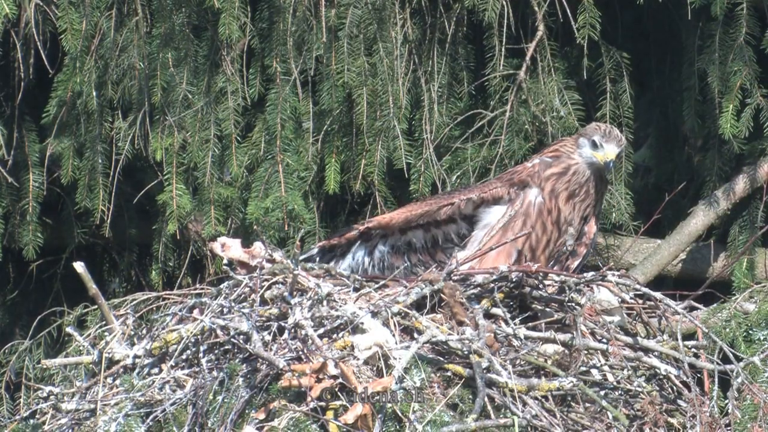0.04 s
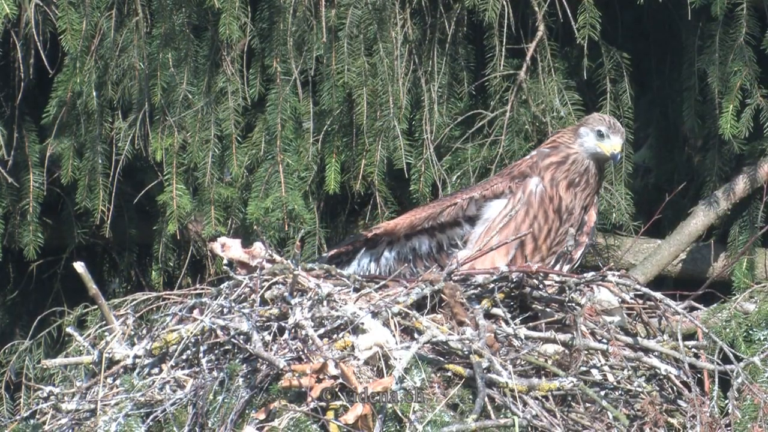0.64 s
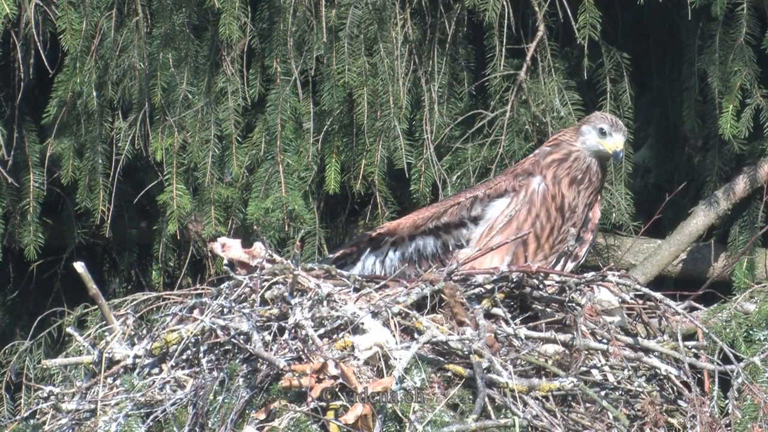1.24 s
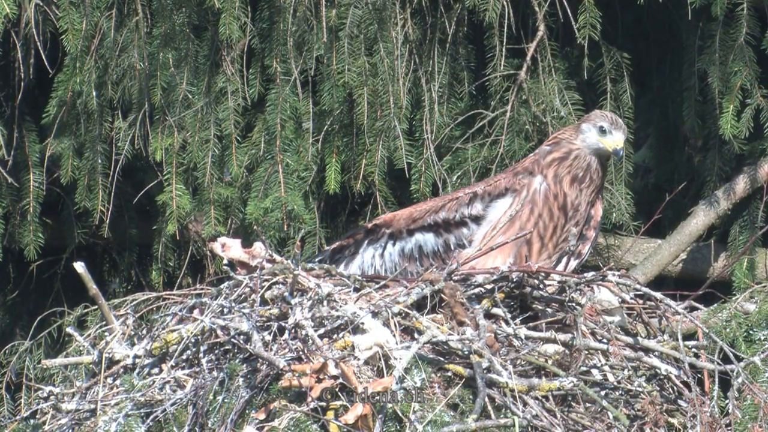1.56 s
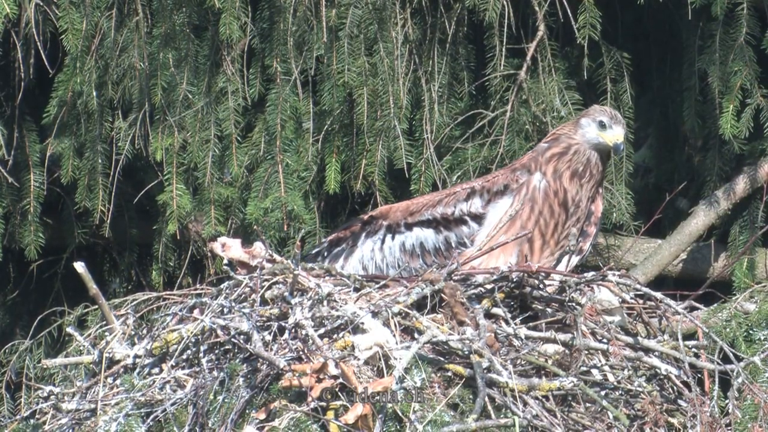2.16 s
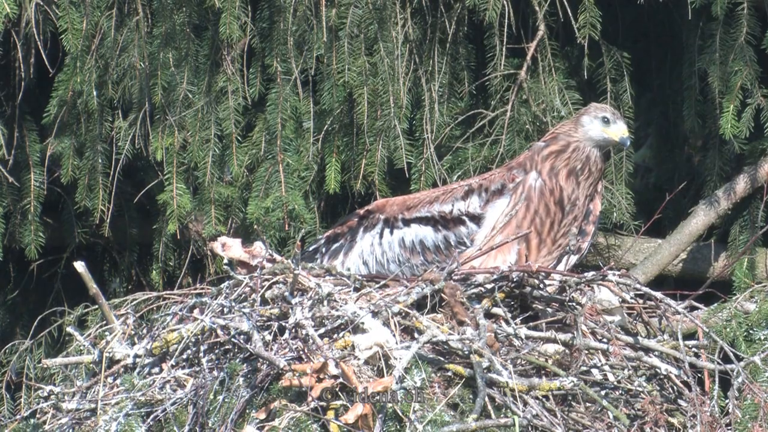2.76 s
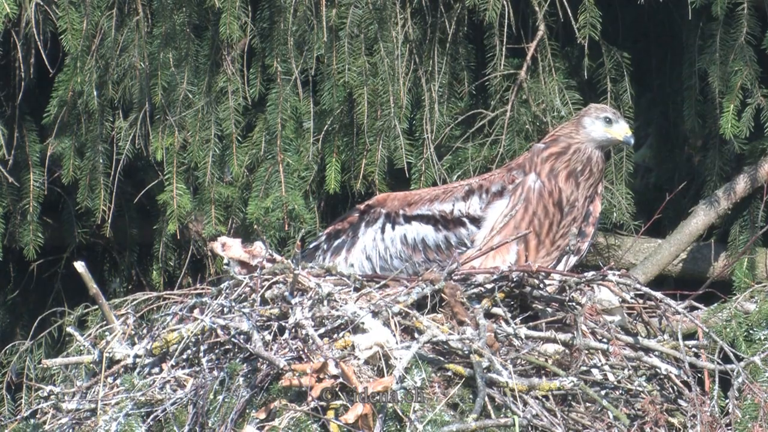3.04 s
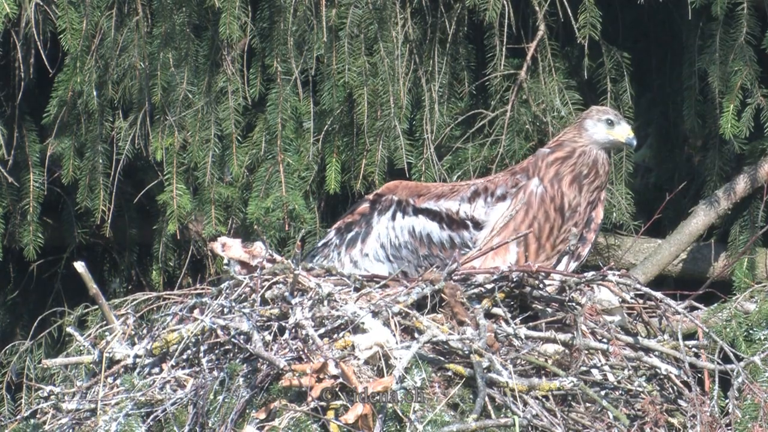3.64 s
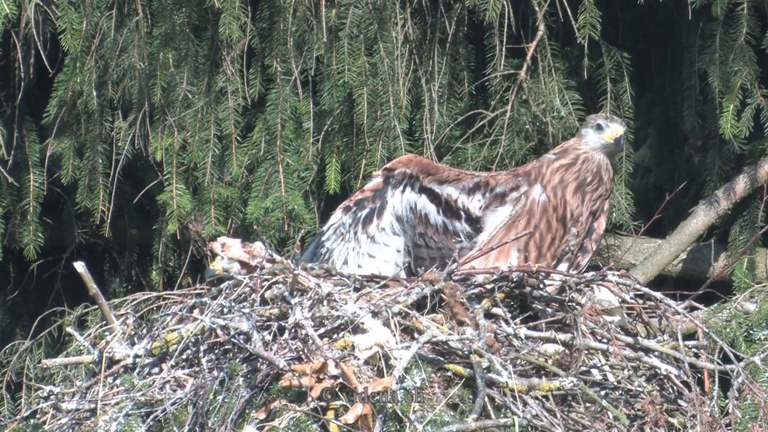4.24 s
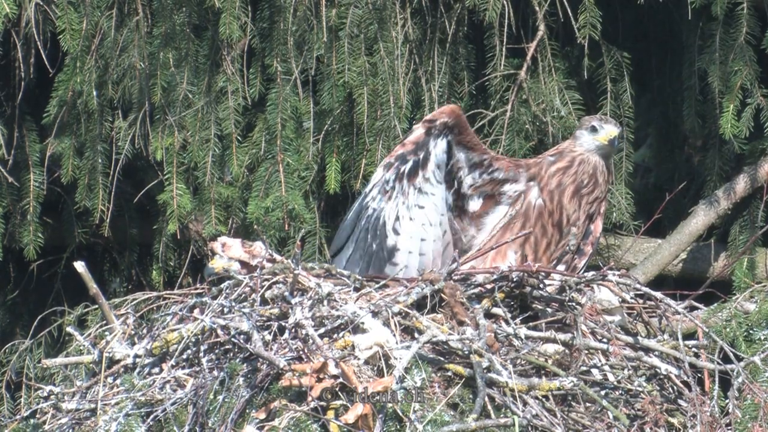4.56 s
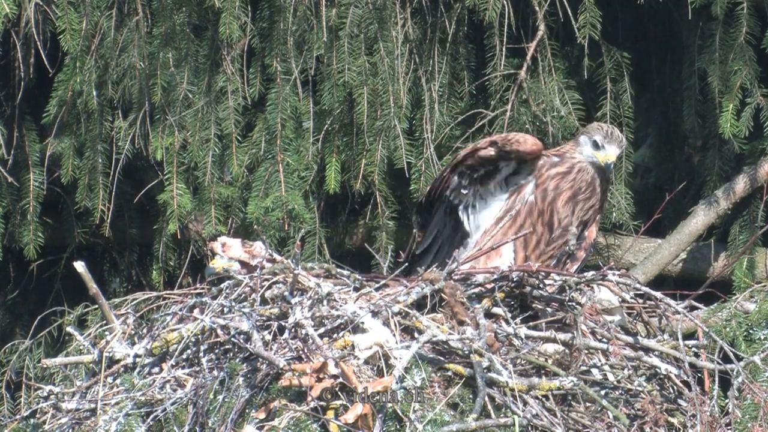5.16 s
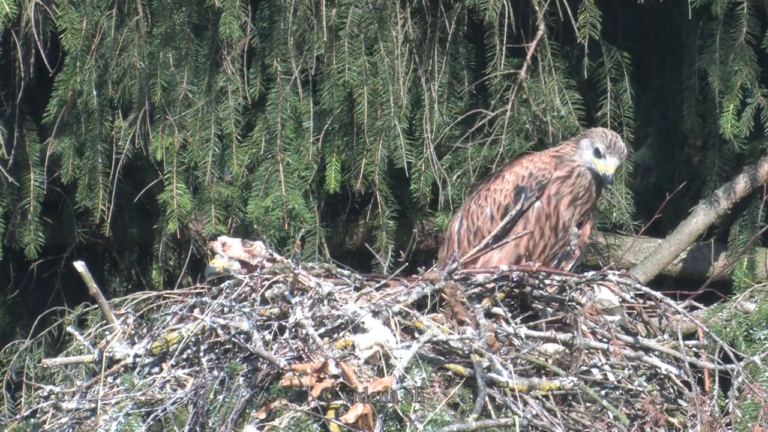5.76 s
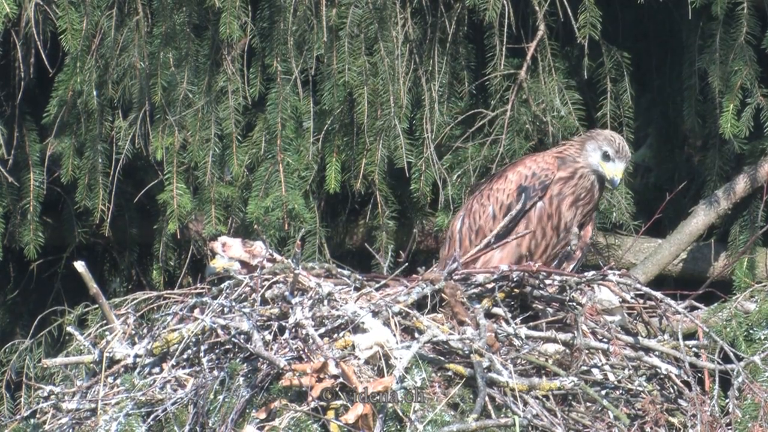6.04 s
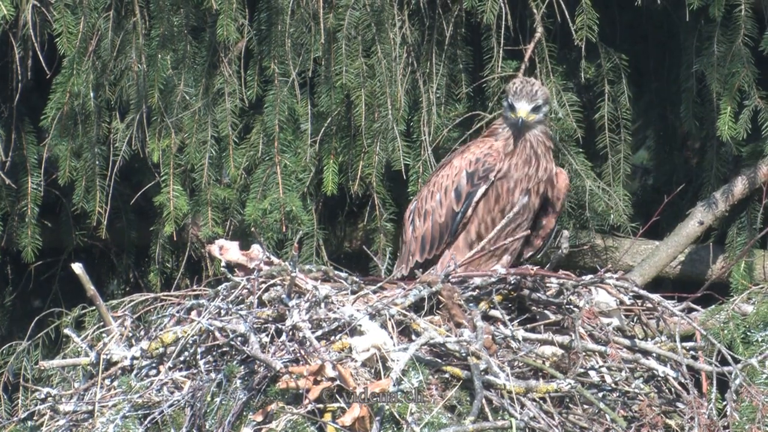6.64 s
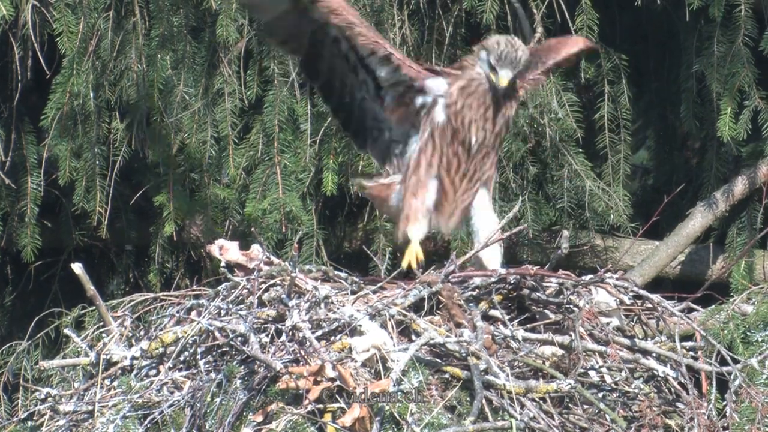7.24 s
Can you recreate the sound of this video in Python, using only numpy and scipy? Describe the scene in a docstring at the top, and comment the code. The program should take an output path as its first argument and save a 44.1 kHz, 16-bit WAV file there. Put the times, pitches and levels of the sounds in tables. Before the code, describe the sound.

A small songbird sings fast, bright chirps and whistles close by in woodland, over faint distant birds and light wind.

```python
"""A warbler's fast whistled phrases ring out close by in a spruce wood; the trees scatter each note. Other
birds call far off over light wind and a distant motor drone, and a low rumble swells near the end. All is heard
through a nest camera that samples slowly: loud notes overload it, it gives a few dry ticks, and spectral
imaging gives high notes a mirror tone in the treble."""
import sys
import numpy as np
from scipy import signal
from scipy.fft import rfft, irfft
from scipy.io import wavfile
from scipy.ndimage import uniform_filter1d

SR = 44100
rng = np.random.default_rng(int(sys.argv[2]) if len(sys.argv) > 2 else 0)


def pcm_store(signal):
    """Save signal as 16-bit PCM."""
    levels = np.round(np.clip(np.atleast_2d(signal), -1, 1) * 32767)
    wavfile.write(sys.argv[1], SR, levels.astype(np.int16).T)


N = 321489
TIME = np.arange(N) / SR
DECIMATION = 4  # the camera samples at SR / DECIMATION


def gain_of(db):
    """Amplitude ratio of a level in decibels."""
    return 10 ** (np.asarray(db) / 20)


def unit_rms(x):
    """Normalisation to an rms of 1."""
    return x / np.sqrt(np.mean(x ** 2) + 1e-20)


def spectrum_at(points, hz):
    """Interpolation of a spectrum on a logarithmic frequency axis."""
    f, value = np.transpose(points)
    return np.interp(np.log(hz + 1), np.log(f + 1), value)


def envelope(curve, column=1):
    """Amplitude envelope, interpolated in decibels."""
    rows = np.array(curve)
    return gain_of(np.interp(TIME, rows[:, 0], rows[:, column]))


def filtered(x, response):
    """Zero-phase filtering: the spectrum is multiplied by a frequency response."""
    return irfft(rfft(x) * response(np.fft.rfftfreq(N, 1 / SR)), N)


def noise(response):
    """Spectral shaping of white noise, at an rms of 1."""
    return unit_rms(filtered(rng.standard_normal(N), response))


def drift(rate_hz):
    """Random modulation: low-pass noise that varies at about the given rate."""
    return noise(lambda hz: np.exp(-(hz / rate_hz) ** 2))


def resonance(centre_hz, half_width_hz):
    """A single resonance excited by noise."""
    return noise(lambda hz: 1 / (1 + ((hz - centre_hz) / half_width_hz) ** 2))


def progress(length):
    """Normalised time, 0 to 1 over a note."""
    return np.linspace(0, 1, max(int(length * SR), 8))


def glides(rows, bow=0):
    """Linear frequency sweeps, bowed upward by a share of their pitch."""
    for start, length, first, last, db in rows:
        u = progress(length)
        yield start, (first + (last - first) * u) * (1 + bow * np.sin(np.pi * u)), db, 0


def tones(notes, waver=.0013, flutter_db=-3, attack_s=.06, release_s=.0073, overtone_db=-42,
          rough=0, slew_rough=0, buzz_hz=190, buzz_slew_hz_per_s=35000):
    """Modulated sines, one per (start, pitch curve, level, roughness); fast modulation is heard as rasp."""
    buzz = 2 * np.pi * np.cumsum(buzz_hz * (1 + .3 * drift(59.85))) / SR
    bend = 1 + waver * drift(300)
    shake = .055 * np.sin(buzz) + .025 * drift(620)
    flutter = gain_of(flutter_db * drift(150))
    out = np.zeros(N)
    for start, hz, db, note_rough in notes:
        age = np.arange(len(hz))
        at = np.minimum(max(int(start * SR), 0) + age, N - 1)
        slew = np.tanh(abs(np.gradient(hz)) * SR / buzz_slew_hz_per_s)
        rasp = np.clip(rough + note_rough + slew_rough * slew, 0, 1)
        phase = 2 * np.pi * np.cumsum(hz * (bend[at] + rasp * shake[at])) / SR
        attack = age / min(attack_s * SR, .19 * len(hz))
        release = age[::-1] / min(release_s * SR, .17 * len(hz))
        fade = np.sin(np.pi / 2 * np.minimum(np.minimum(attack, release), 1))
        tremolo = 1 + .42 * rasp * np.cos(buzz[at])
        overtone = gain_of(overtone_db) * np.sin(2 * phase) * (2 * hz < SR / DECIMATION / 2)
        out[at] += fade * flutter[at] * tremolo * gain_of(db) * (np.sin(phase) + overtone)
    return out


def tree_echoes(x, t60, build_s):
    """Reverberation by scattering: sparse echoes off trunks and boughs build up, then decay."""
    t = np.arange(SR) / SR
    taps = rng.standard_normal(SR) * (rng.random(SR) < .04)
    tail = taps * gain_of(-60 * t / t60) * (1 - np.exp(-(t / build_s) ** 2))
    return signal.fftconvolve(x, tail / np.linalg.norm(tail))[:N]


# spectrum of moving air: (frequency [Hz], relative level [dB])
WIND_SPECTRUM = [(15, -31), (25, -25.5), (50, -26.5), (80, -26.5), (130, -29.5), (200, -28.5), (500, -33.5),
                 (1000, -32.5), (1900, -36), (2900, -40.5), (3900, -36), (5000, -40.5), (5500, -35),
                 (6500, -69.5)]
# likeness of left and right: (frequency [Hz], correlation [0-1])
WIND_COHERENCE = [(30, 1), (130, 0.84), (300, 0.61), (1000, 0.63), (2000, 0.56), (3000, 0.82)]
# strength of the wind: (time [s], level at 300-1300 Hz [dB])
WIND_LEVEL = [(0, -61.5), (.6, -63), (3, -64), (5, -65), (6.33, -63.5), (6.9, -57.5), (7.29, -57)]


def wind():
    """Air in the trees: broadband noise, slowly swelling and partially coherent between the channels."""
    left, independent = rng.standard_normal((2, N))
    coherence = lambda hz: spectrum_at(WIND_COHERENCE, hz)
    right = filtered(left, coherence) + filtered(independent, lambda hz: np.sqrt(1 - coherence(hz) ** 2))
    air = filtered(np.array([left, right]), lambda hz: gain_of(spectrum_at(WIND_SPECTRUM, hz)))
    midband = filtered(air[0], lambda hz: (hz > 300) & (hz < 1300))
    return air / midband.std() * envelope(WIND_LEVEL) * gain_of(.39 * drift(7.4))


# strength of the motor's tone: (time [s], relative level [dB])
DRONE_LEVEL = [(0.0, -66.5), (0.28, -62.5), (2.39, -71), (4.1, -65.5), (5.72, -73), (5.78, -73.5),
               (6.35, -73.5), (6.4, -84)]


def motor_drone():
    """A distant motor: a wandering tone beats with narrow-band noise, above a lower hum."""
    tone = np.sqrt(2) * np.sin(2 * np.pi * np.cumsum(149 + 2.5 * drift(6)) / SR)
    drone = (1.02 * tone + .4 * resonance(149, 12)) * envelope(DRONE_LEVEL) * gain_of(1.5)
    return drone + resonance(118, 6.3) * gain_of(-72.5)


# spells of whine: (time [s], duration [s], first pitch [Hz], last pitch [Hz], level [dB])
WHINE_GLIDES = [(0, 0.5, 518, 502, -60.5), (5.78, 0.23, 535, 585, -65.5), (6.28, 0.148, 527, 453, -61),
                (6.72, .16, 534, 569, -61.5)]


def engine_whine():
    """A far engine drifts in and out: a gliding fundamental with its second harmonic."""
    return tones(glides(WHINE_GLIDES), waver=.0063, flutter_db=2, overtone_db=-8.5)


# strength of the rumble: (time [s], relative level of lowest band [dB], of upper bands [dB])
RUMBLE_LEVELS = [(6.35, -61, -81), (6.37, -73, -87), (6.454, -65, -56.5), (6.898, -48.5, -48),
                 (7.13, -60.5, -51.5), (7.232, -35, -47), (7.29, -51, -51)]


def rumble():
    """Noise excites two resonances about an octave apart and a weak, broad one above them."""
    onset = np.clip((TIME - RUMBLE_LEVELS[0][0]) / .24, 0, 1)
    low = resonance(102, 17.5) * envelope(RUMBLE_LEVELS) * gain_of(4.5)
    upper = resonance(220, 17.3) * gain_of(1.5) + resonance(342, 110) * gain_of(-9.5)
    bands = low + upper * envelope(RUMBLE_LEVELS, column=2)
    return filtered(onset * bands, lambda hz: 1 - np.exp(-(hz / 65) ** 4))


# dry crackles: (time [s], level [dB])
TICK_PULSES = [(1.527, -39.5), (4.459, -73), (4.701, -41), (5.186, -61), (5.298, -42.5), (5.695, -50),
               (6.227, -41), (6.335, -44.5)]


def ticks(decay_s=.0029):
    """Transients: bass-heavy noise under pulses that rise and decay exponentially."""
    pulses = sum(gain_of(db) * np.exp(-abs(TIME - when) / decay_s) for when, db in TICK_PULSES)
    colour = [(100, 11), (400, 4.5), (2500, 2.5), (8000, -19), (16000, -9.5)]
    return pulses * noise(lambda hz: gain_of(spectrum_at(colour, hz)))


# slow fluting: (time [s], duration [s], first pitch [Hz], last pitch [Hz], relative level [dB])
THRUSH_NOTES = [(.02, 0.1, 1550, 1314, -63), (.56, 0.21, 1740, 1630, -66), (.8, .22, 1520, 1442, -68.5),
                (1.5, .15, 1750, 1617, -64.5), (1.62, 0.079, 2000, 2120, -59.5),
                (1.75, .2, 1440, 1337, -66), (1.97, 0.12, 2250, 2106, -60.5),
                (2.35, 0.049, 1484, 1930, -62.5), (2.41, .055, 2010, 2110, -61),
                (.98, 0.052, 2110, 2100, -62.5), (2.64, .15, 2326, 2374, -66),
                (4.85, .07, 2296, 2218, -64.5), (6.08, 0.25, 2320, 2330, -62)]


def far_birds(count=70):
    """A thrush and scattered chirps, so distant that reverberation outweighs the direct sound."""
    when, length, pitch, glide, size = rng.random((count, 5)).T
    hz = 2750 + 1300 * pitch ** 2
    first, last = hz * (1 + .2 * (glide - .5)), hz * (1 - .25 * (glide - .5))
    rows = np.transpose([when * N / SR, .063 + .08 * length, first, last, -65 + 6 * size])
    thrush = tones(glides(THRUSH_NOTES, bow=.0092), waver=.006, flutter_db=5.5, attack_s=.023, rough=.11)
    chirps = tree_echoes(tones(glides(rows, bow=.012)), t60=.32, build_s=.0069)
    return chirps + gain_of(-1.5) * thrush + gain_of(1) * tree_echoes(thrush, t60=1, build_s=.0038)


# spells of soft chips: (start [s], end [s], rate [1/s], mean duration [s],
# mean upward sweep [share of pitch], highest level [dB])
TWITTER_SPELLS = [(0.203, 0.443, 25, 0.015, 0.029, -55), (0.807, 1.359, 30, 0.024, .35, -46.5),
                  (1.594, 1.95, 40, .025, -0.15, -51.5), (1.991, 2.08, 122, 0.02, -0.028, -48),
                  (2.101, 2.3, 22, 0.028, -0.15, -44.5), (3.498, 3.722, 18, 0.081, 0.017, -52.5),
                  (3.852, 3.96, 36, 0.021, 0, -47.5), (4.046, 4.122, 50, 0.011, 0.53, -42),
                  (5.757, 6.044, 37, 0.025, 0.094, -49), (6.32, 6.56, 42, .016, 0.12, -48.5)]


def twitter():
    """Short random frequency sweeps, heard as thin chips between the main notes."""
    rows = []
    for start, end, rate, length, rise, db in TWITTER_SPELLS:
        count = max(round((end - start) * rate), 1)
        for k, (jitter, stretch, pitch, glide, size) in enumerate(rng.random((count, 5))):
            onset = start + (k + jitter) / count * (end - start)
            hz = 2500 + 2500 * pitch
            sweep = (rise + .45 * (glide - .5)) / 2
            rows.append((onset, length * (.5 + stretch), hz * (1 - sweep), hz * (1 + sweep), db - 9 * size))
    return tones(glides(rows, bow=.03), attack_s=.008, release_s=.008, rough=.3)


# held whistles: (time [s], duration [s], pitch [Hz], relative level [dB])
LOW_PIPS = [(.091, 0.046, 2868, -28), (.172, 0.035, 2900, -26.5), (.245, 0.036, 2886, -27),
            (1.15, 0.038, 3040, -33.5), (1.649, 0.023, 3876, -28), (1.875, 0.056, 4340, -48.5),
            (2.09, 0.042, 4260, -48), (2.35, 0.065, 3040, -44), (2.43, 0.126, 3050, -56.5),
            (2.35, 0.047, 4390, -55.5), (3.137, 0.049, 3310, -42), (3.545, 0.067, 3123, -41),
            (3.68, 0.13, 2800, -52), (4.76, 0.089, 2986, -34.5), (4.857, 0.031, 2933, -28.5),
            (4.915, 0.045, 2882, -25), (6.792, 0.05, 2930, -25.5), (6.882, 0.042, 2943, -29)]
HIGH_SEETS = [(1.435, 0.08, 4910, -33.5), (2.552, 0.021, 5260, -33.5), (4.312, .057, 5060, -37),
              (4.42, .039, 4956, -37.5), (4.52, 0.03, 4924, -35), (4.995, 0.024, 5020, -45.5),
              (6.768, 0.034, 5020, -32.5), (6.855, 0.05, 4977, -34), (6.975, .026, 4890, -36)]


def held_notes(flick_hz=110, rough=.04):
    """Nearly constant frequency: each note flicks up into pitch, sags a little and drops off."""
    for rows, sag_hz, swell_db in (LOW_PIPS, 30, -1.5), (HIGH_SEETS, 60, 10):
        for start, length, hz, db in rows:
            u = progress(length) - .5
            yield start, hz - sag_hz * u - flick_hz * (2 * u) ** 4, db + swell_db * u, rough


# slurred whistles: (time [s], duration [s], first pitch [Hz], target pitch [Hz],
# relative level [dB], swell [dB])
SETTLING_FALLS = [(0, 0.037, 5700, 4516, -21.5, -13), (.535, 0.044, 4290, 3905, -29.5, 8),
                  (.626, 0.026, 5400, 4090, -25, 12), (1.503, .083, 4123, 3407, -22, -5.5),
                  (2.315, 0.036, 3470, 2885, -44.5, -5.5), (2.68, 0.11, 4400, 3260, -43.5, -14),
                  (2.86, 0.12, 2950, 2570, -50.5, -2), (3.5, 0.045, 3570, 3360, -39.5, -8),
                  (4.733, 0.038, 3700, 3080, -41.5, -2.5), (5.212, .044, 4950, 3764, -28.5, 11),
                  (5.287, 0.022, 5500, 4053, -22.5, 5.5), (6.15, 0.029, 4000, 3740, -40.5, 12.5),
                  (6.963, 0.049, 3795, 2890, -31.5, -10), (7.278, 0.027, 4660, 4240, -21, 18)]
HANGING_DROPS = [(.96, 0.03, 3150, 2414, -35.5, 1), (1.129, 0.022, 4280, 3220, -26, 0),
                 (2.178, .04, 4900, 4170, -35.5, -1), (2.18, 0.085, 3840, 2800, -45, -7),
                 (3.02, .025, 2210, 1990, -57.5, 0), (3.395, 0.069, 2770, 1850, -52, -8),
                 (3.565, 0.033, 3790, 3160, -33, 4), (3.905, 0.028, 3690, 3100, -31.5, -16),
                 (4.297, .031, 2310, 1950, -48.5, -2), (4.888, .053, 4410, 4306, -44, 0.5),
                 (5.668, .036, 3760, 3310, -19, -2.5), (5.785, .021, 2350, 1630, -40, 7),
                 (5.928, .062, 2913, 2466, -27, 6), (5.985, .035, 2440, 1870, -41, -1.5),
                 (5.013, .05, 3620, 3190, -47, 0), (6.335, .05, 4430, 4200, -52.5, 16.5),
                 (6.335, .04, 2320, 1800, -57, -20), (6.385, 0.019, 3660, 3110, -53.5, -4),
                 (7.03, 0.12, 4010, 3300, -48, -4)]
S_BENDS = [(.978, .04, 2694, 3000, -27, -1.5), (1.186, 0.071, 3010, 2486, -27.5, -9),
           (1.672, .059, 4046, 4154, -22, 0.5), (2.0, .046, 3290, 3860, -42.5, 10),
           (2.515, 0.033, 4240, 5400, -53, 28), (3.08, 0.033, 3130, 3340, -49, 7),
           (3.85, .04, 3405, 3655, -37.5, -8), (6.315, 0.024, 2760, 3730, -45.5, 0),
           (2.765, .045, 2900, 3720, -44, 10), (3.33, .06, 3485, 3800, -47.5, 0),
           (3.468, 0.022, 3290, 3840, -41.5, -3), (3.482, .023, 2464, 3765, -37.5, 24),
           (3.66, .035, 3356, 3930, -35.5, 0), (4.065, .033, 2007, 3700, -48, 5),
           (4.105, .022, 2170, 3890, -45, 18), (4.195, .012, 4040, 5700, -45, 11),
           (4.243, .01, 5140, 5320, -39, 7), (5.627, .046, 3508, 3685, -20.5, -1),
           (5.757, .02, 1960, 2600, -41.5, 7), (5.872, 0.078, 2845, 3030, -27.5, -16.5),
           (6.405, 0.028, 4360, 5960, -42, 5.5), (6.54, .06, 2407, 2800, -49, 9),
           (6.542, 0.0072, 4100, 5530, -40.5, 9)]
# whistles that reach the target midway and return, same columns
UP_AND_BACK = [(1.015, 0.051, 2864, 3428, -27, 2.5), (1.727, .016, 4560, 5500, -33, -15),
               (1.76, 0.062, 2790, 3280, -45, 5), (1.82, 0.05, 3510, 3950, -46, -4),
               (3.808, 0.058, 3460, 3770, -40, -13), (3.815, 0.033, 2456, 2880, -35, 4),
               (5.775, .05, 4810, 5055, -46, -5), (4.571, .052, 3870, 4520, -24, 7),
               (4.665, 0.039, 4640, 5296, -18, -1), (6.595, .062, 3846, 4230, -22.5, 4.5),
               (6.671, 0.058, 4690, 5300, -21, -5.5)]
DOWN_AND_BACK = [(1.338, 0.039, 5350, 5005, -21.5, 3.1), (1.374, 0.037, 4540, 4070, -20.5, 2.3),
                 (6.176, 0.072, 5810, 4598, -20, 1.2)]


def slurs():
    """Frequency modulation: each kind of slur follows its own path from first pitch (0) to target (1)."""
    kinds = [(SETTLING_FALLS, lambda u: np.expm1(-3.6 * u) / np.expm1(-3.6), 0),
             (HANGING_DROPS, lambda u: u ** 1.5, 0),
             (S_BENDS, lambda u: np.sin(np.pi / 2 * u) ** 2, 0),
             (UP_AND_BACK, lambda u: 1 - abs(2 * u - 1) ** 1.6, 0),
             (DOWN_AND_BACK, lambda u: 1 - abs(2 * u - 1) ** 2.3, -3)]
    for rows, path, ends_db in kinds:
        for start, length, first, target, db, swell in rows:
            u = progress(length)
            hz = first + (target - first) * path(u)
            yield start, hz, db + swell * (u - .5) + ends_db * (1 - path(u)), 0


# contours of two set figures: (position [0-1], pitch [Hz], relative level [dB], roughness [0-1])
WARBLE_CONTOUR = [(0, 4386, -13.5, 0.07), (.1, 3734, -3, 0.03), (0.251, 3583, 1, 0),
                  (0.448, 4045, -4.5, .2), (.55, 3678, -2.5, 0.4), (.75, 3545, 0, 0.51),
                  (1.001, 3495, -1, .4)]
YODEL_CONTOUR = [(0, 3413, -1.5, 0.13), (.14, 3575, 1, 0.13), (0.352, 3850, -3.5, 0.15),
                 (.42, 3470, -12, .5), (.5, 2548, -12.5, 0.21), (.63, 2758, -3.5, 0.055),
                 (0.841, 2950, -7.5, 0.26), (1, 2850, -14, 0)]
# each utterance of them: (time [s], duration [s], relative level [dB], swell [dB])
WARBLE_CALLS = [(.426, .11, -23, -5), (5.101, .114, -20.5, -1), (7.163, .118, -18.5, -1)]
YODEL_CALLS = [(.725, 0.16, -20, 0.5), (5.402, .158, -19, -1)]


def figures():
    """Time scaling: a smoothed contour is stretched to the length of each call, keeping its pitch."""
    for rows, contour in (WARBLE_CALLS, WARBLE_CONTOUR), (YODEL_CALLS, YODEL_CONTOUR):
        position, *controls = np.transpose(contour)
        for start, length, db, swell in rows:
            u = progress(length)
            hz, stress, rough = (uniform_filter1d(np.interp(u, position, c), size=300) for c in controls)
            yield start, hz, db + stress + swell * (u - .5), rough


def chatter_partials(notes, from_s=3.32, to_s=3.95):
    """Nasal timbre: each high note of the chatter is flanked by a weaker partial below and above."""
    for start, hz, db, rough in notes:
        if from_s < start < to_s and hz.mean() > 3000:
            yield start, hz * .73, db - 13, rough
            yield start, hz * 1.34, db - 13.5, rough


def warbler():
    """The near singer: direct sound, early reflections off branches and the reverberation of the wood."""
    notes = [*held_notes(), *slurs(), *figures()]
    tone = tones([*notes, *chatter_partials(notes)], waver=.0032, flutter_db=.59, attack_s=.031,
                 release_s=.0083, overtone_db=-30.5, slew_rough=.53)  # fast glides turn buzzy
    effort = abs(signal.hilbert(tone))
    scratch = noise(lambda hz: np.exp(-((hz - 4300) / 1300) ** 2))
    voice = gain_of(1.63) * tone + gain_of(-32) * effort * scratch
    chips = twitter()
    # soft notes are half hidden by foliage, so more of them arrives as echo
    hidden = 1 + .8 * np.exp(-uniform_filter1d(effort, size=2400) / .016)
    # needles and twigs throw back high notes more strongly than low ones
    needles = lambda hz: gain_of(spectrum_at([(2500, -1.5), (3700, -2.5), (4800, 2.5)], hz))
    scattered = filtered(voice * hidden, needles) + 2 * chips
    early = gain_of(-9) * tree_echoes(scattered, t60=.2, build_s=.005)
    late = gain_of(-19.5) * tree_echoes(scattered, t60=.66, build_s=.027)
    return voice + chips + early + late


def scene():
    """Superposition: birds in the middle; a level difference sets the background slightly right."""
    birds = warbler() + far_birds()
    background = wind() + motor_drone() + rumble() + engine_whine()
    return birds + background * gain_of([[-1], [.8]])


def overload(x, knee, ceiling=.13):
    """Saturation rounds off the peaks that reach the ceiling."""
    return x / (1 + abs(x / ceiling) ** knee) ** (1 / knee)


# response of the converter's output filter: (frequency [Hz], gain [dB])
OUTPUT_FILTER = [(0, -1.5), (3400, -0.5), (4000, -1), (4600, -1), (5200, -5.5), (5800, -9.5), (6425, -14),
                 (7025, -24), (7400, -34), (7700, -42.5), (8200, -51.5), (9500, -64.5), (16000, -70.5)]


def record(dry, edge_hz=15900, dc_offset=.0046):
    """Clipping and imaging: slow sampling mirrors the spectrum; a gentle filter lets the images through."""
    clipped = overload(dry, knee=42)
    sampled = np.zeros_like(dry)
    sampled[:, ::DECIMATION] = DECIMATION * clipped[:, ::DECIMATION]
    smoothed = filtered(sampled, lambda hz: gain_of(spectrum_at(OUTPUT_FILTER, hz)))
    amplified = overload(smoothed - .61 * smoothed ** 3, knee=59)  # adds a faint third harmonic
    excess = np.clip(dry - clipped, -.04, .04)
    crackle = gain_of(-26.5) * excess * rng.standard_normal(N)  # the flattened peaks spit
    hiss = gain_of(-76.5) * rng.standard_normal(N) + gain_of(-69.5) * rng.standard_normal((2, N))
    lowpass = signal.firwin(511, edge_hz, window=("kaiser", 9), fs=SR)
    return signal.oaconvolve(amplified + crackle + ticks() + hiss, lowpass[None], "same") + dc_offset


dry = scene()
out = record(dry)
pcm_store(out)
```